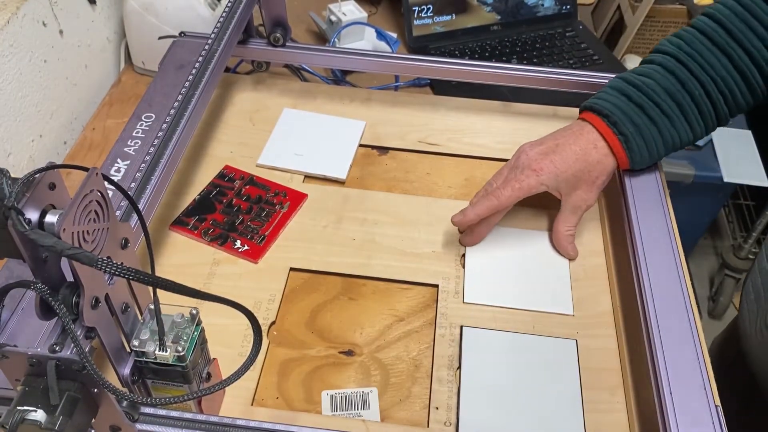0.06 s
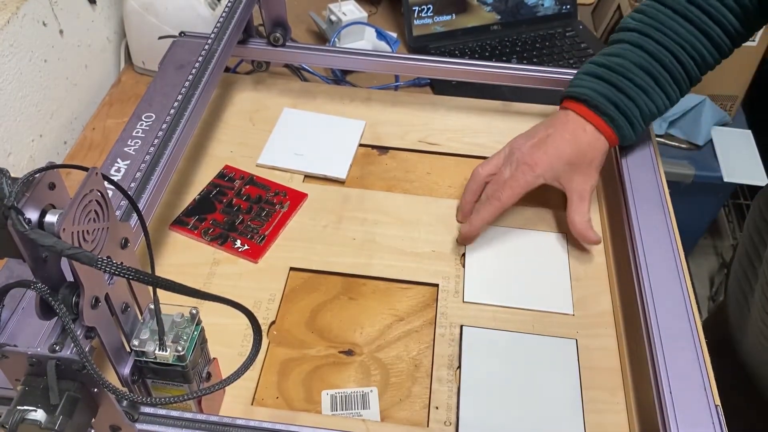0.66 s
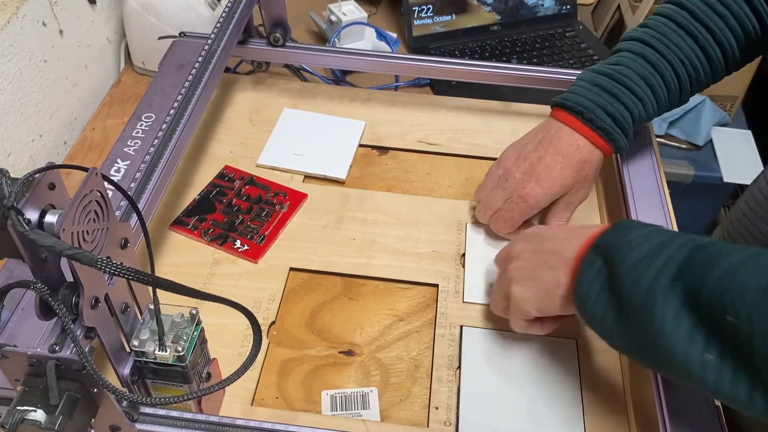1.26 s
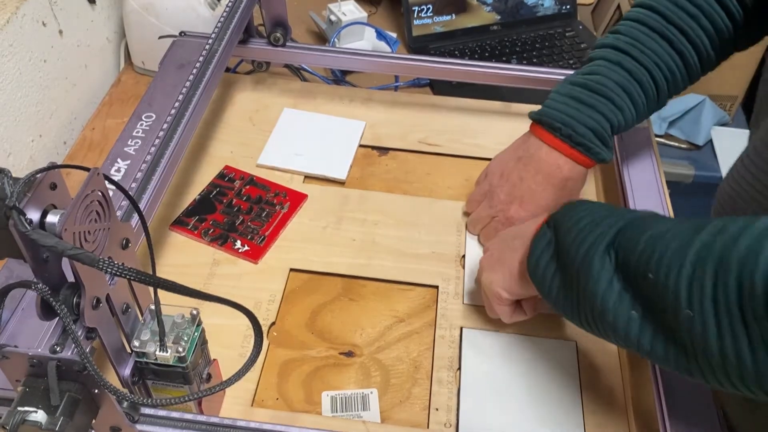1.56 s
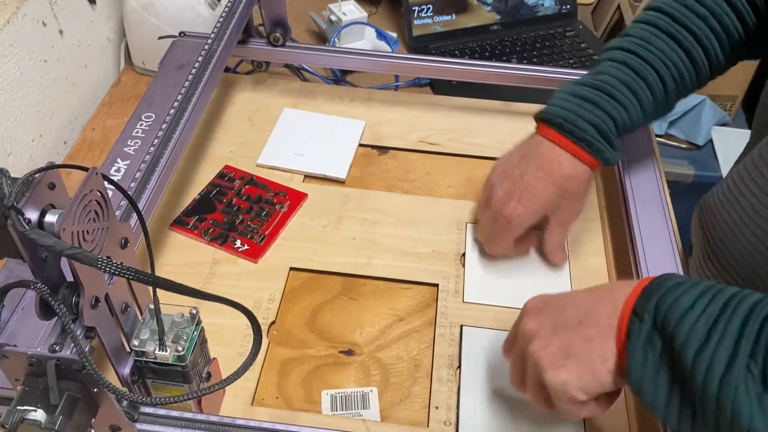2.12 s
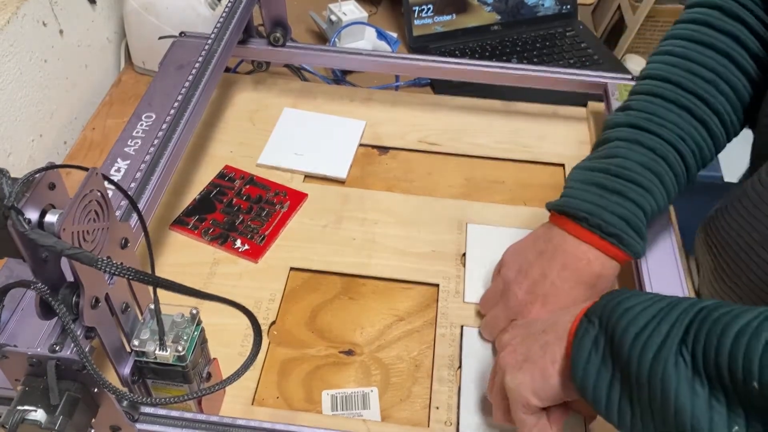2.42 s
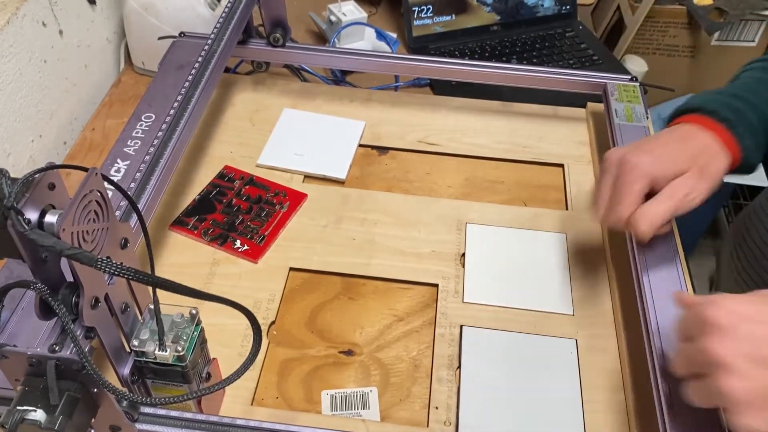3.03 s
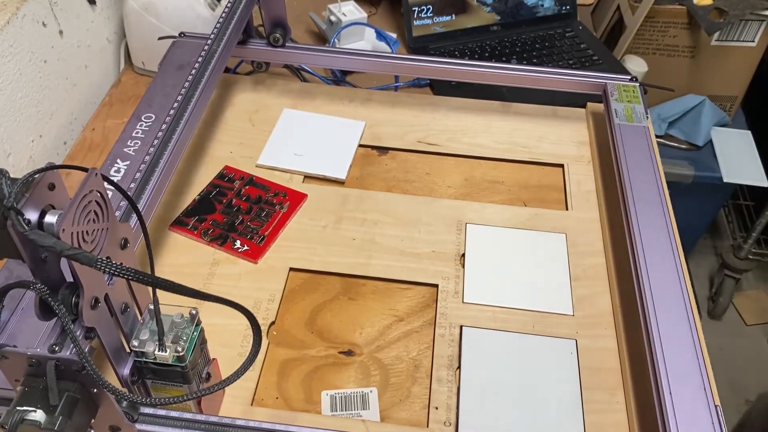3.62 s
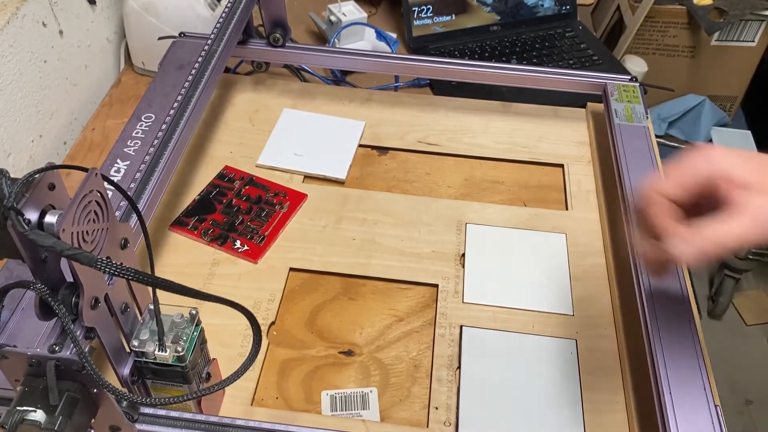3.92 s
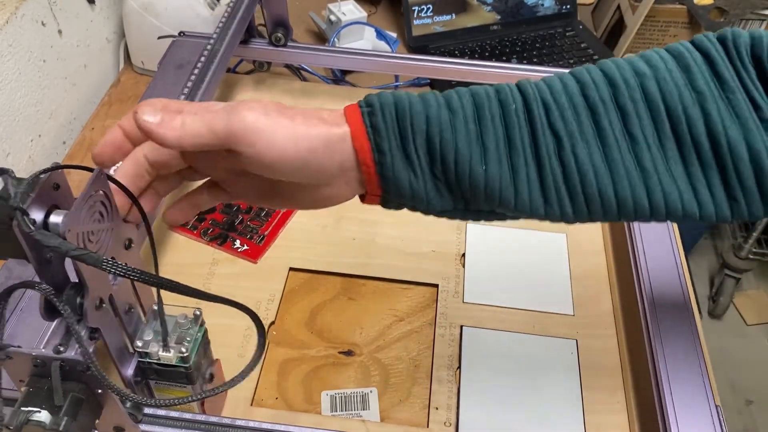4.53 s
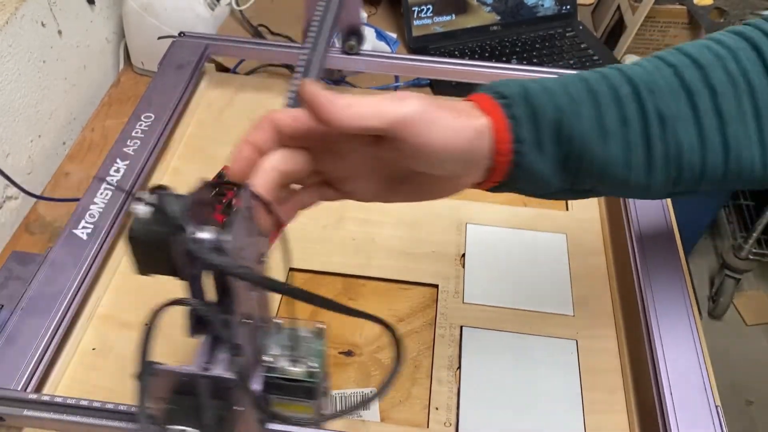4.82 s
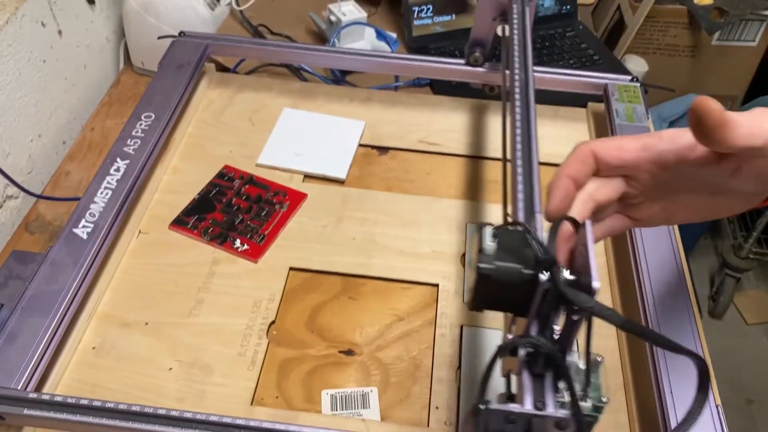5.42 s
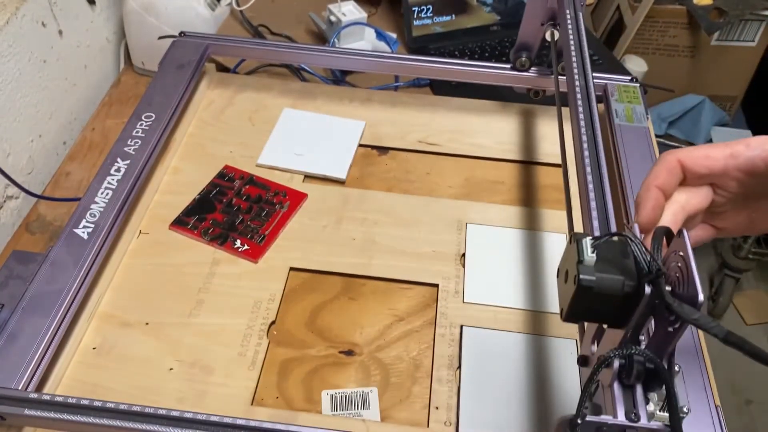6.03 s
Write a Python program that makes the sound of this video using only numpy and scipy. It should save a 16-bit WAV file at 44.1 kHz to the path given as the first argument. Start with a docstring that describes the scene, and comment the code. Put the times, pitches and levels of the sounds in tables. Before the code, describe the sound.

A tile clicks and snaps into a wooden board with one loud clack, then a machine carriage rolls along rails over a steady fan hum.

```python
"""A ceramic tile snaps into its pocket in a plywood board with one loud clack, as the impact excites the
damped modes of tile and board. Around it the tile ticks and scrapes, fingers rub and knock on it, and
the bench booms. The board lies on the bed of a laser engraver, whose fan hums and blows throughout.
Then the gantry is rolled across by hand, carrying the fan from left to right, and bumps its end stop."""
import sys
import numpy as np
from scipy import signal
from scipy.fft import rfft, irfft
from scipy.io import wavfile

SR = 44100
rng = np.random.default_rng(int(sys.argv[2]) if len(sys.argv) > 2 else 0)


def generate_wav(signal):
    """Clip the signal to [-1, 1] and save it as 16-bit WAV at the path in sys.argv[1]."""
    frames = np.transpose(np.atleast_2d(signal))
    scaled = np.clip(frames, -1, 1) * 32767
    pcm = np.round(scaled).astype(np.int16)
    wavfile.write(sys.argv[1], SR, pcm)


N = 276507
TIME, HZ = np.arange(N) / SR, np.fft.rfftfreq(N, 1 / SR)
AGE = TIME[:SR]  # t/s since an event began


def amp(db):
    """Amplitude ratio of a level in decibels."""
    return 10 ** (np.asarray(db) / 20)

def unit(x):
    """Normalisation to unit rms."""
    return x / np.sqrt(np.mean(x ** 2) + 1e-20)

def read(points, hz):
    """Interpolation on a logarithmic frequency axis."""
    f, value = np.transpose(points)
    return np.interp(np.log(hz + 1), np.log(f + 1), value)

def add(mix, s, sound):
    """Superposition of a sound starting at time s."""
    part = mix[round(s * SR):][:len(sound)]
    part += sound[:len(part)]

def noise(spectrum, size=N):
    """Spectrally shaped noise of unit rms, so the spectrum's levels are relative."""
    gain = amp(read(spectrum, np.fft.rfftfreq(size, 1 / SR)))
    return unit(irfft(rfft(rng.standard_normal(size)) * gain, size))

def drift(rate_hz):
    """Low-pass random fluctuation of unit rms."""
    return unit(irfft(rfft(rng.standard_normal(N)) * np.exp(-(HZ / rate_hz) ** 2), N))

def ring(modes):
    """Free vibration: a sum of damped modes, neighbours in antiphase."""
    return sum((-1) ** k * amp(db - 60 * AGE / t60) * np.sin(2 * np.pi * hz * AGE)
               for k, (hz, db, t60) in enumerate(modes))

def bend(x, spread_s=0.00686, corner_hz=337):
    """Dispersion of bending waves: lower frequencies arrive later."""
    size = 2 * len(x)
    hz = np.fft.rfftfreq(size, 1 / SR)
    phase = 2 * np.pi * spread_s * corner_hz * np.arctan(hz / corner_hz)
    return irfft(rfft(x, size) * np.exp(-1j * phase), size)[:len(x)]

# Treble phase shift round the body between two microphones: f/Hz, left lead/rad
TREBLE_PHASE = [(0, 0), (7200, 0), (8900, -3.1), (10400, -6), (11600, -6.5), (13300, -9.4), (14600, -12.5)]
def stereo(x, paths):
    """Localisation by level and phase differences between left and right."""
    table = np.array(paths)
    lean = amp(read(table[:, [0, 1]], HZ) / 2)
    lag = np.exp(-1j * (read(table[:, [0, 2]], HZ) + read(TREBLE_PHASE, HZ)))
    return irfft(rfft(x) * np.array([lean, lag / lean]), N)

# Reverberation time of a small cluttered workshop: f/Hz, T60/s
ROOM_DECAY = [(100, 0.46), (500, 0.15), (2000, 0.13), (6000, 0.13), (15000, 0.018)]
def room(x, gap_s=.004, reflections_per_s=3000):
    """Diffuse reverberation: dense decaying reflections, independent on each side."""
    taps = rng.standard_normal((2, SR)) * (rng.random((2, SR)) < reflections_per_s / SR) * (AGE > gap_s)
    hz, t, spectra = signal.stft(taps, SR, nperseg=256)
    tail = signal.istft(spectra * amp(-60 * t / read(ROOM_DECAY, hz)[:, None]), SR, nperseg=256)[1]
    return signal.fftconvolve(x[None], tail / np.linalg.norm(tail[0]), axes=1)[:, :N]

# The gantry, pushed off by hand and slowing towards the stop: t/s, relative speed
GANTRY_SPEED = [(4.5, 0.062), (4.66, 0.53), (4.82, 0.99), (4.96, 1.05), (5.16, 0.76), (5.4, 0.42),
                (5.8, 0.42), (5.9, 0)]
def travel():
    """Gantry position (0-1) as the integral of speed; returns both."""
    moving = (TIME > GANTRY_SPEED[0][0]) & (TIME < GANTRY_SPEED[-1][0])
    speed = np.interp(TIME, *np.transpose(GANTRY_SPEED)) * moving
    return np.clip(np.cumsum(speed) / np.sum(speed), 0, 1), speed

# Paths from the fan, parked and at the far end: f/Hz, left minus right/dB, left lead/rad, coherence
PARKED_PATHS = [(146, 0.65, 0, 0.9), (350, -1, -0.1, 0.55), (520, 2, 0.15, 0.5), (720, 0.6, -0.15, 0.68),
                (1100, 0.6, 0.7, 0.58), (1450, 2.5, 1.3, 0.35), (1700, 0.5, 0.6, 0.5),
                (2150, 1.5, 1.7, 0.72), (2800, 5, 1.4, 0.15), (3600, 7, 0.2, 0.3), (4400, 4, -0.5, 0.45),
                (5500, 3, -0.9, 0.35), (6800, 1, 0, 0.85), (9000, 0, 0, 0.97), (14000, 0.3, 0, 0.8)]
FAR_PATHS = [(146, 0.45, 0, 0.9), (350, -2, -0.1, 0.5), (500, 0.5, 0.3, 0.5), (720, -1, -0.1, 0.7),
             (1200, -2, -0.6, 0.78), (1600, 1, -0.7, 0.45), (2200, 2, -0.3, 0.88), (3000, 3, 0.5, 0.55),
             (4200, 3, -0.6, 0.6), (5300, 4.5, -0.2, 0.2), (6800, 0.5, 0.2, 0.88), (9000, 0.3, 0, 0.95),
             (14000, 0.3, 0, 0.85)]
# Reflections off nearby surfaces: delay/s, level/dB
NEAR_ECHOES = [(.0041, -50), (.0067, -17), (0.0107, -15.5)]
def wide_noise(spectrum, paths=FAR_PATHS, low_cut_hz=120):
    """Partially coherent stereo noise without bass, comb-filtered by reflections."""
    comb = 1 + sum(amp(db) * np.exp(-2j * np.pi * HZ * delay) for delay, db in NEAR_ECHOES)
    colour = comb * HZ ** 4 / (HZ ** 4 + low_cut_hz ** 4)
    left, other = colour * rfft(noise(spectrum)), colour * rfft(noise(spectrum))
    coherence = np.clip(read(np.array(paths)[:, [0, 3]], HZ), 0, 1)
    right = coherence * left + np.sqrt(1 - coherence ** 2) * other
    return stereo(irfft([left, right], N), paths)

# Airflow spectra, parked and at the far end: f/Hz, level/dB
AIR_PARKED = [(120, 11.5), (200, -1), (500, 0), (700, 4.5), (950, -0.5), (1350, 0), (1600, 1), (1850, -2.5),
              (2070, 1), (2200, 2), (3000, -4.5), (4400, -9), (7000, -8.5), (9000, -16), (12000, -18.5),
              (14300, -28.5), (16000, -54)]
AIR_FAR = [(180, -8), (300, 0.5), (500, -1), (700, 0), (1200, 0.5), (1750, -3), (2300, 2.5), (2900, -6.5),
           (4100, -12), (5500, -14), (6600, -14), (9000, -21), (12500, -25), (14000, -37), (16000, -60)]
def fan_air(parked_db=-50, far_db=-51):
    """Broadband flow noise, changing colour as the gantry carries the fan across."""
    place = travel()[0]
    parked = amp(parked_db) * wide_noise(AIR_PARKED, PARKED_PATHS)
    far = amp(far_db) * wide_noise(AIR_FAR)
    return np.sqrt(1 - place) * parked + np.sqrt(place) * far

# The fan's thin whirr: t/s, f/Hz, level/dB
WHIRR_GLIDE = [(5.2, 6330, -93), (5.48, 6350, -73), (5.8, 6700, -68), (6.27, 6870, -69)]
def fan_whirr(width_hz=380, wander_hz=70):
    """Narrow-band air noise whose centre rises as the gantry nears the far end."""
    s, hz, db = np.transpose(WHIRR_GLIDE)
    angle = 2 * np.pi * np.cumsum(np.interp(TIME, s, hz) + wander_hz * drift(8.2)) / SR
    band = drift(width_hz) * np.sin(angle) + drift(width_hz) * np.cos(angle)
    return amp(np.interp(TIME, s, db)) * (TIME > s[0]) * band

# Housing resonances: f/Hz, width/Hz, parked level/dB, far-end level/dB
HOUSING_TONES = [(612.4, 4.4, -68.5, -67), (845, 14.3, -73, -78), (1101, 60.1, -78.5, -62.5),
                 (1270, 50, -76, -64), (1467, 40, -73, -71), (1696, 8.9, -70.5, -74),
                 (1943, 11.5, -70.5, -80), (2157, 11.1, -69, -75), (2216, 41.6, -67, -64.5),
                 (2303, 14, -73.5, -64), (2368, 107.7, -78, -67), (2420, 10.7, -79, -68),
                 (2740, 90, -85, -67.5), (3170, 30.6, -74.5, -70.5), (3490, 6.8, -77.5, -79)]
def fan_housing(swell_db=3.5, shift_power=0.96):
    """Resonances of finite bandwidth: faint wandering tones whose balance shifts as the fan moves."""
    place, out = travel()[0] ** shift_power, np.zeros(N)
    for hz, width, parked_db, far_db in HOUSING_TONES:
        cycles = np.cumsum(hz + width * drift(3 * width)) / SR
        level_db = parked_db + place * (far_db - parked_db) + swell_db * drift(width)
        out += amp(level_db) * unit(np.sin(2 * np.pi * cycles))
    return out

# Hand pressure on board, frame or gantry: t/s, duration/s, attenuation/dB (negative swells the hum)
PRESSES = [(0, 0.71, 2), (0.395, 0.038, 10), (1.457, 0.68, 3), (1.624, 0.16, 9), (2.105, 0.017, 12),
           (2.405, 0.33, 5.5), (2.43, 0.025, 5), (2.732, 0.4, 1.5), (2.984, 0.05, -4), (4.478, .075, 1.5),
           (4.555, 0.082, -5.5), (4.634, 0.078, -3), (4.762, 0.18, -5), (5.95, 0.2, 4)]
def hand_damping_db(ease_s=0.019):
    """Contact damping of the hum: each press eases in, holds and eases out."""
    return sum(db * np.clip(np.minimum(TIME - s, s + length - TIME) / ease_s + .5, 0, 1)
               for s, length, db in PRESSES)

# Blade-passing tone and its octave: level/dB
BLADE_LEVELS = [-64, -68]
# Low background noise of the room: f/Hz, level/dB
ROOM_MURK = [(10, -40), (25, -10), (42, 1), (60, 7.5), (110, -0.5), (180, 3), (260, -6.5), (500, -54)]
RUMBLE_POWER = 0.15  # rolling vibration grows as this power of speed
def fan_hum(rotor_hz=145.7, blades=5, parked_db=-38.5, far_db=-41.5, rolling_db=-0.5, murk_db=-62):
    """Forced vibration of the frame at the rotation rate, with blade tones, over the room's murk."""
    angle, (place, speed) = 2 * np.pi * rotor_hz * TIME, travel()
    level_db = parked_db + place * (far_db - parked_db) + rolling_db * speed - hand_damping_db()
    hum = amp(level_db + 0.5 * drift(22)) * np.sin(angle)
    flutter = 1 + 0.19 * speed ** RUMBLE_POWER * drift(22)  # uneven while the wheels roll
    whine = sum(amp(db + drift(4)) * np.sin(blades * k * angle) for k, db in enumerate(BLADE_LEVELS, 1))
    return np.sqrt(2) * (hum * flutter + whine) + amp(murk_db) * noise(ROOM_MURK)

# Spectra of wheel rumble, wheel hiss and the passing gantry's swish: f/Hz, level/dB
WHEEL_RUMBLE = [(10, -38), (25, -21), (40, 4), (75, 8), (110, 6), (150, 7.5), (200, -3.5), (300, -33),
                (500, -46), (1000, -74)]
WHEEL_HISS = [(150, 13.5), (300, 5), (450, 0.5), (800, 1), (1400, -5), (2400, -14), (4700, -15),
              (7000, -38), (14000, -48)]
SWISH = [(1300, -17), (1750, 8), (2200, 2), (2800, -16), (3500, -3), (4700, -6.5), (5600, -10), (7500, -38)]
def wheels(rumble_db=-43, build_s=0.21, hiss_db=-44.5, hiss_power=1.63, swish_db=-56, swish_s=5.15):
    """Rolling noise on rails: rumble and hiss follow power laws of speed, with a swish midway."""
    speed = travel()[1]
    build = np.clip((TIME - GANTRY_SPEED[0][0]) / build_s, 0, 1)
    rumble = build * amp(rumble_db + drift(23)) * speed ** RUMBLE_POWER * noise(WHEEL_RUMBLE)
    swish = amp(swish_db) * np.exp(-((TIME - swish_s) / 0.15) ** 2 / 2) * wide_noise(SWISH)
    hiss = amp(hiss_db) * speed ** hiss_power * wide_noise(WHEEL_HISS)
    return rumble + swish + hiss

# Modes of the gantry frame: f/Hz, level/dB, T60/s
FRAME_MODES = [(214, -2, 0.22), (283, -1, 0.57), (366, -3, 0.21), (405, -7, 0.23), (486, -5.5, 0.19),
               (610, 2.5, 0.035), (750, -2, 0.05), (1060, -8, 0.08), (1290, -5, 0.055), (1700, -11, 0.042),
               (2180, 0, 0.057), (2450, -4, 0.077)]
def end_stop(stop_s=5.817, stop_db=-39):
    """Impact excitation: the frame rings dully against its stop."""
    out = np.zeros(N)
    add(out, stop_s, amp(stop_db) * ring(FRAME_MODES))
    return out

# Pushes on a tile and jolts of the gantry: t/s, boom level/dB, shudder level/dB
THUMPS = [(0.39, -51, -46), (1.389, -22.5, -38), (1.551, -33.5, -33.5), (2.391, -25.5, -40),
          (2.572, -62, -47.5), (2.986, -39.5, -45), (4.7681, -43, -52), (5.018, -31.5, -63),
          (5.1125, -37.5, -58), (5.8328, -33.5, -29)]
# Spectrum of the bench's shudder: f/Hz, level/dB
SHUDDER = [(10, -42), (25, -40), (42, 11), (75, 10.5), (110, 10.5), (210, -5), (320, -10), (600, -43)]
# Swaying modes of the bench: f/Hz, level/dB, T60/s
BENCH_MODES = [(39, -11, 1), (63.9, -3, 1), (75, -5, 1), (278.4, 1.5, 0.19)]
def bench_thumps(boom_hz=141, swell_s=0.022, rise_s=0.0057, shudder_s=0.079, sway_db=-4, loose_db=-3):
    """Transient response of the bench: a low resonance builds for a few cycles; sway and shudder last."""
    out, swell = np.zeros(N), AGE / swell_s
    boom = (swell * np.exp(1 - swell)) ** 2 * np.sin(2 * np.pi * boom_hz * AGE)
    sway = amp(sway_db) * ring(BENCH_MODES)
    onset = 1 - np.exp(-AGE / rise_s)
    for s, boom_db, shudder_db in THUMPS:
        shudder = amp(loose_db) * noise(SHUDDER, size=SR) * np.exp(-AGE / shudder_s)
        add(out, s, amp(boom_db) * boom + amp(shudder_db) * (shudder + sway) * onset)
    return out

# Fingers and sleeves rubbing, and a tile scraping along its pocket: t/s, duration/s, level/dB
RUBS = [(0.383, 0.11, -57), (0.618, 0.038, -53.5), (0.676, 0.2, -56), (3.129, 0.16, -62.5),
        (3.362, 0.55, -64), (4.53, 0.064, -61)]
SCRAPES = [(1.3, 0.19, -59.5), (1.83, 0.2, -58), (2.34, .09, -59), (2.428, 0.033, -53)]
# Their spectra: f/Hz, level/dB
RUB_SPECTRUM = [(800, -7), (2500, -4), (6500, -4.5), (11000, -5.5), (15500, -13)]
SCRAPE_SPECTRUM = [(600, -20), (1150, -12), (1480, 12), (1750, 1), (2300, -5), (4000, -31)]
def friction(strokes, spectrum, grain_db=2, grain_hz=1500):
    """Sliding friction: short strokes of finely grained noise."""
    envelope = np.zeros(N)
    for s, length, db in strokes:
        add(envelope, s, amp(db) * signal.windows.tukey(int(length * SR), .6))
    return envelope * unit(noise(spectrum) * amp(grain_db * drift(grain_hz)))

# Spectrum of a fingertip squeaking on glaze: f/Hz, level/dB
SQUEAK_SPECTRUM = [(2300, -40), (2900, -5), (3130, 9), (3320, -3), (4000, -40)]
def finger_squeak(start_s=2.454, level_db=-49, fade_s=0.016):
    """Stick-slip of skin, heard as a rough burst of narrow-band noise."""
    out = np.zeros(N)
    envelope = np.sqrt(AGE / fade_s) * np.exp(-AGE / fade_s)
    add(out, start_s, amp(level_db) * noise(SQUEAK_SPECTRUM, size=SR) * envelope)
    return out

# Tile on pocket or gantry on frame: t/s, level/dB, decay/s, low body gain/dB, tile ring level/dB
TICKS = [(0.3633, -21, 0.00095, -17, -17), (0.3643, -27.5, 0.0008, 3, -10.5),
         (0.4295, -33, 0.0014, -8, -22), (0.5267, -41, 0.0009, -14, -20), (1.5487, -14, 0.00078, -21, -33),
         (5.383, -55, 0.0048, -1, -30), (5.8144, -28, 0.0017, -10, -29), (5.822, -41.5, .003, 5, -18)]
# Spectrum of the contact: f/Hz, level/dB
TICK_SPECTRUM = [(200, 15), (900, 9.5), (1400, 5), (2050, 9.5), (2700, -4), (3400, 8.5), (4400, -2.5),
                 (5500, -5.5), (6700, 4.5), (8000, 7.5), (9000, 2), (10000, 10), (10900, 5), (11800, 6.5),
                 (13200, 6), (14500, -1), (16000, 4)]
# Modes of the tile alone: f/Hz, level/dB, T60/s
TILE_MODES = [(1760, -1, 0.031), (2010, -3, 0.027), (2240, 4, 0.036), (3350, 0, 0.079), (3450, -7, 0.023),
              (4710, -15, 0.035), (5600, 1, 0.04), (5800, -10, .025), (5850, -3, 0.03), (6610, -7, 0.016),
              (6850, -5, .03), (8080, -8, 0.029), (9900, -24, 0.02), (10300, 0, .016), (11500, -3, 0.02)]
def edge_ticks(tail_db=-18, tail_s=0.011, body_hz=2500):
    """Brief hard contact: a broadband burst and the tile's ring, dispersed so that the treble leads."""
    out = np.zeros(N)
    tail = amp(tail_db) * np.exp(-AGE / tail_s)  # scatter of dense high modes
    for s, db, decay_s, body_db, ring_db in TICKS:
        burst = noise(TICK_SPECTRUM, size=SR) * (np.exp(-AGE / decay_s) + tail)
        burst += amp(ring_db) * ring(TILE_MODES)
        body = signal.lfilter(*signal.butter(1, body_hz, fs=SR), burst)
        shelved = burst + (amp(body_db) - 1) * body
        add(out, s, amp(db) * bend(shelved, spread_s=0.000676, corner_hz=3000))
    return out

# Blows on the tile, the loudest snapping it home: t/s, ring level/dB, hardness/Hz, low cut/Hz,
# crack level/dB, crack decay/s, hand damping/(dB/s)
KNOCKS = [(0.364, -39.5, 444, 154, -46, 0.011, 60), (1.3857, -28, 574, 110, -85, 0.014, 380),
          (1.5477, -11, 6000, 60, -28.5, 0.012, 70), (1.5902, -31, 1610, 900, -37, 0.005, 1200),
          (2.3798, -16.5, 520, 564, -85, 0.014, 520), (2.3875, -25, 385, 120, -85, 0.014, 420),
          (2.445, -40, 600, 300, -85, .014, 30)]
# Coupled modes of tile and plywood: f/Hz, level/dB, T60/s
BOARD_MODES = [(200, -20.5, 0.096), (210, -11.5, 0.052), (302, -29, 0.14), (399, -8.5, 0.096),
               (432, -20, 0.24), (473, -0.5, 0.0073), (533, -6, 0.057), (668, -12, 0.046),
               (740, -10, 0.061), (776, -7.5, 0.027), (956, -8.5, 0.064), (980, -6.5, 0.012),
               (1010, -1, 0.029), (1100, -8.5, 0.038), (1195, -24, 0.21), (1300, -12, 0.053),
               (1384, -16, 0.074), (1670, -19, 0.039), (1768, -2.5, 0.025), (1840, -20, 0.073),
               (2000, -23, 0.046), (2010, -7, 0.025), (2160, -24, 0.12), (2410, -19, 0.064),
               (2500, -20, 0.065), (2900, -18, 0.037), (3340, -41, 0.054), (3900, -24, 0.042),
               (4880, -18, 0.024), (5400, -20, 0.046), (5670, -19, 0.017)]
# Spectrum of the crack at impact: f/Hz, level/dB
CRACK_SPECTRUM = [(200, -12), (450, 0), (1000, 9), (1500, 8), (2000, 5), (3000, -1), (4000, -1.5),
                  (5200, -5), (7000, -27), (9000, -15), (11000, -8), (13000, -20), (16000, -34)]
def tile_knocks():
    """Modal response to impact: soft fingers omit high modes, blows near the rim omit low ones."""
    out = np.zeros(N)
    for s, db, hard_hz, low_hz, crack_db, crack_s, damping in KNOCKS:
        softness = signal.butter(8, min(hard_hz * np.sqrt(2), SR / 3), fs=SR, output="sos")
        body = signal.sosfilt(softness, ring(BOARD_MODES) * amp(-damping * AGE))
        body = signal.lfilter(*signal.butter(2, low_hz, "high", fs=SR), body)
        crack = amp(crack_db) * noise(CRACK_SPECTRUM, size=SR) * np.exp(-AGE / crack_s)
        add(out, s, amp(db) * bend(body) + crack)
    return out

# Paths from the board: f/Hz, left minus right/dB, left lead/rad
BOARD_PATHS = [(100, 2.3, 0.058), (200, 0.5, -0.1), (378, 0, -1.05), (530, 1.8, -1.15), (720, 2, -0.2),
               (1050, -1.5, 0.56), (1360, 3, 1), (1730, -4, -0.72), (2140, 3, 1), (3420, 1.5, 1),
               (4480, 2, 0.2), (5430, 4, -1.6), (7000, 0, -0.27), (10900, 0, 0.74)]
def scene(room_db=-15):
    """Superposition of the hand work, its reverberation, the moving fan and the wheels."""
    work = tile_knocks() + edge_ticks() + friction(RUBS, RUB_SPECTRUM)
    work += friction(SCRAPES, SCRAPE_SPECTRUM) + finger_squeak() + end_stop()
    tones, place = fan_hum() + fan_housing() + fan_whirr(), travel()[0]
    fan = (1 - place) * stereo(tones, PARKED_PATHS) + place * stereo(tones, FAR_PATHS) + fan_air()
    return stereo(work + bench_thumps(), BOARD_PATHS) + amp(room_db) * room(work) + fan + wheels()

def record(dry, edge_hz=16100):
    """Band limiting by a linear-phase low-pass filter."""
    low_pass = signal.firwin(511, edge_hz, window=("kaiser", 9), fs=SR)
    return signal.oaconvolve(dry, low_pass[None], "same")


dry = scene()
out = record(dry)
generate_wav(out)
```